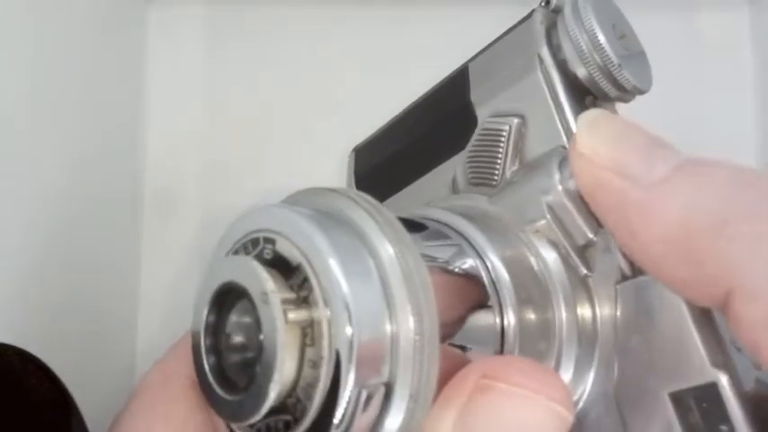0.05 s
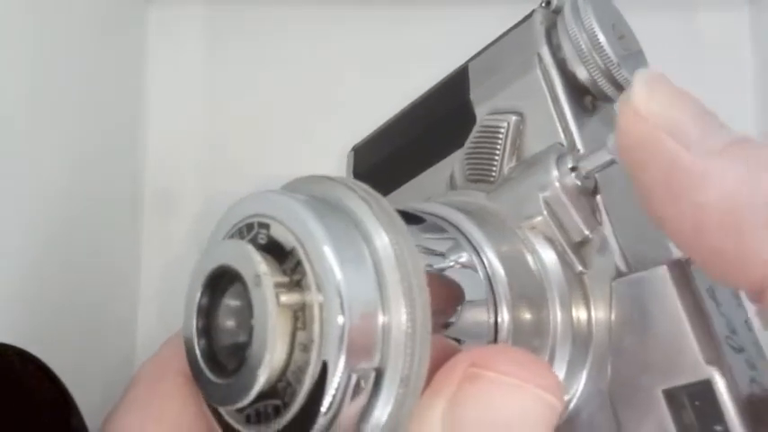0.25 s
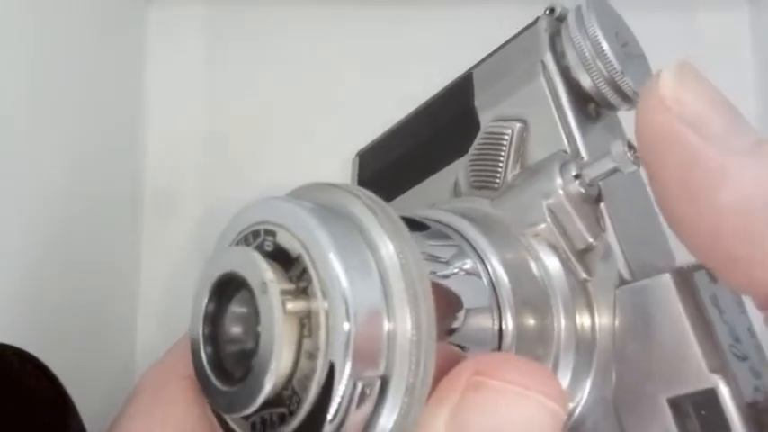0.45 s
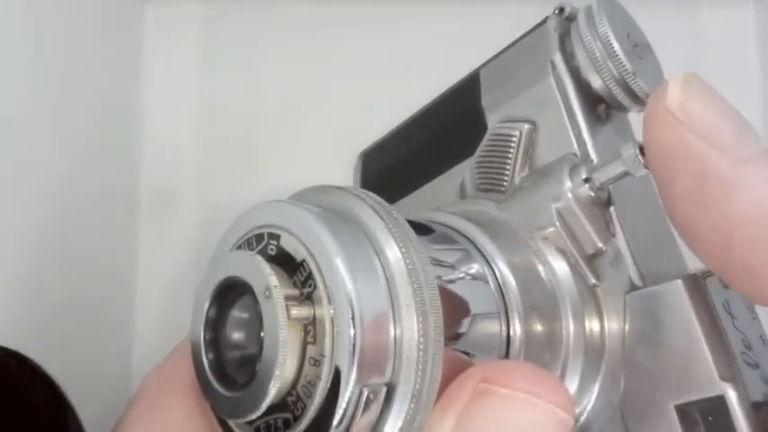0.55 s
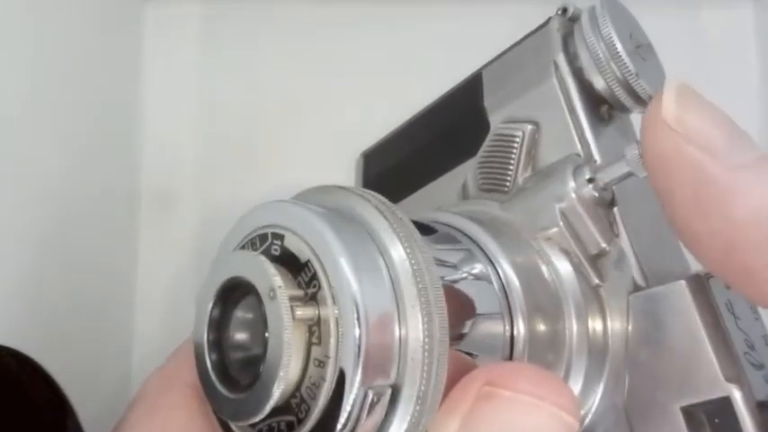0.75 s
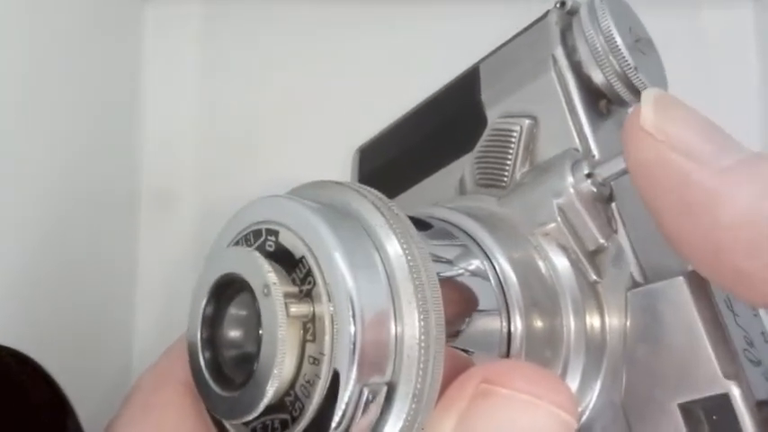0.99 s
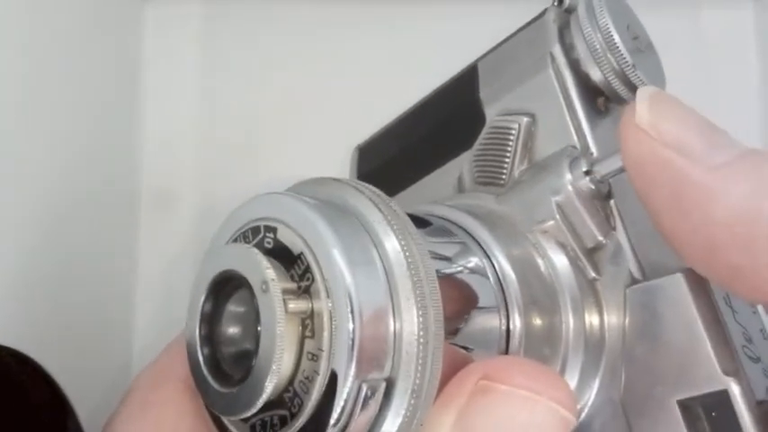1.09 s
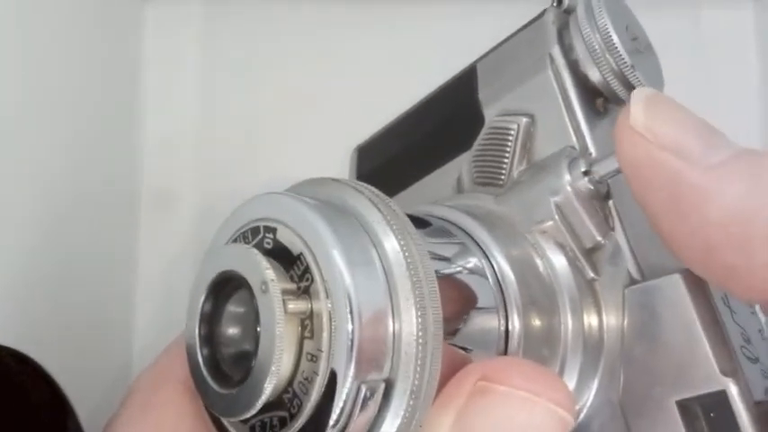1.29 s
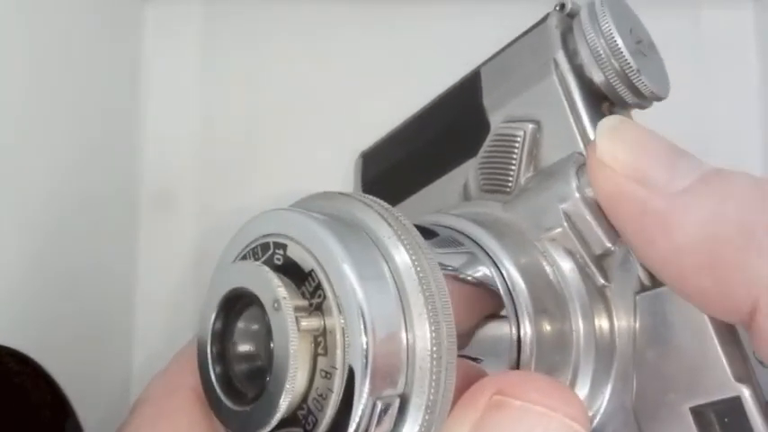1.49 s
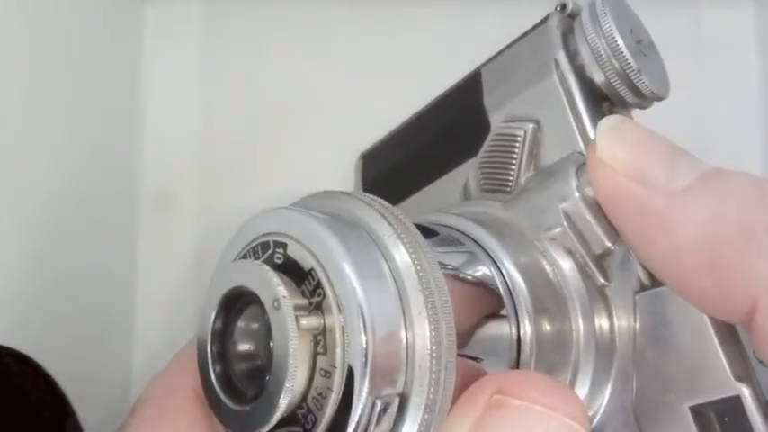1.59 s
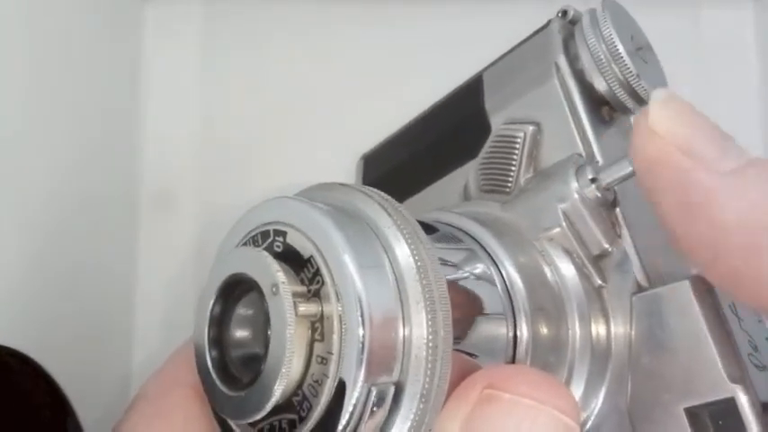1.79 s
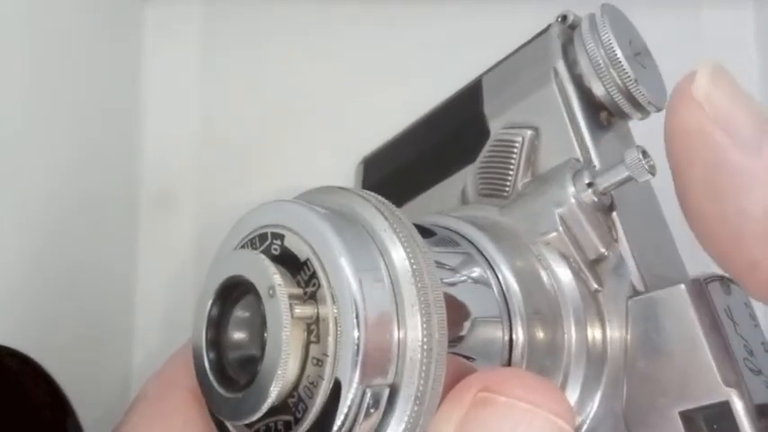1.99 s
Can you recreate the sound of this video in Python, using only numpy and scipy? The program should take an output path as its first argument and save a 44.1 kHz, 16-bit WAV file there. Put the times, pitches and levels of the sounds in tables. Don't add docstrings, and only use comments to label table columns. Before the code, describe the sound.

A hand-worked mechanical camera shutter snaps, its button clicks back, and it snaps once more

```python
import sys
import numpy as np
from scipy import signal
from scipy.fft import rfft, irfft, next_fast_len
from scipy.io import wavfile
from scipy.ndimage import uniform_filter1d, map_coordinates

SR = 44100
rng = np.random.default_rng(int(sys.argv[2]) if len(sys.argv) > 2 else 0)


def to_linear_factor(level_db):
    exponent = np.asarray(level_db, float) / 20
    return 10 ** exponent


def wav_record(signal):
    frames = np.transpose(np.atleast_2d(signal))
    bounded = np.clip(frames, -1, 1)
    quanta = np.round(bounded * 32767).astype(np.int16)
    wavfile.write(sys.argv[1], SR, quanta)


N = 90404
TIME_S = np.arange(N) / SR
BROAD_DB = -19
SINK_DB, SINK_S = 13, 0.25


def unit(x):
    return x / np.sqrt(np.mean(x ** 2) + 1e-20)


def along(points, hz):
    f, v = np.transpose(points)
    return np.interp(np.log(hz + 1), np.log(f + 1), v)


def wobble(rate_hz):
    return map_coordinates(rng.standard_normal(2000), [TIME_S * rate_hz])


def filtered(x, response):
    m = next_fast_len(len(x) + 8192)
    return irfft(rfft(x, m) * response(np.fft.rfftfreq(m, 1 / SR)), m)[:len(x)]


def capped(x):
    top_hz, edge_hz = 15760, 100

    def edge(hz):
        return np.sin(np.pi / 2 * np.clip((top_hz - hz) / edge_hz + 0.5, 0, 1)) ** 2
    return filtered(x, edge)


def evened(x):
    z = rfft(x)
    local_power = uniform_filter1d(np.abs(z) ** 2, size=60)
    return irfft(z / np.sqrt(local_power), len(x)) * (np.arange(len(x)) < len(x) // 2)


def body(x, peaks, smear=1, broad_db=BROAD_DB):
    def response(f):
        total = to_linear_factor(broad_db) * (1j * f / (1000 + 1j * f)) ** 2
        for k, (hz, width_hz, db) in enumerate(peaks):
            drive = (-1) ** k * to_linear_factor(db) * 1j * f * width_hz * np.sqrt(smear)
            total = total + drive / (hz * hz - f * f + 1j * f * width_hz * smear)
        return total
    return filtered(x, response)


def duck_db(db, t):
    recover_s, slope, from_db = 0.085, -1.1, -25
    return slope * max(db - from_db, 0) * np.exp(-(t / recover_s) ** 2) * (t >= 0)


# (frequency [Hz], t60 [s])
ROOM_DECAY = [(500, 0.37), (2000, 0.33), (6000, 0.4), (8000, 0.32), (10500, 0.3), (13000, .25),
              (15000, .27)]
# (frequency [Hz], level [dB])
ROOM_TILT = [(300, -2), (1000, 1.5), (3000, -4), (6000, 2), (7900, -2), (10500, 0), (13000, -1.5),
             (15300, 3)]


def room_tail(db, peaks, broad_db):
    streak_db, streak_life = 3.5, 0.07
    hz, t, z = signal.stft(rng.standard_normal(SR // 2), SR, nperseg=512)
    strong, long = rng.standard_normal((2, len(hz), 1))
    t60_s = along(ROOM_DECAY, hz)[:, None] * np.exp(streak_life * long)
    fall_db = -60 * t / t60_s + along(ROOM_TILT, hz)[:, None] + streak_db * strong
    fall_db = fall_db + duck_db(db, t) - SINK_DB * (t / SINK_S) ** 1.5
    noise = signal.istft(z * to_linear_factor(fall_db), SR, nperseg=512)[1]
    tail = capped(body(noise, peaks, 3, broad_db))
    return tail / np.linalg.norm(tail)


def contacts(rows, peaks, room=None, broad_db=BROAD_DB):
    lead_s, rise_s, strike_db, rough_db, room_broad_db = 0.3, 0.0008, 11, 2, 3
    out, t = np.zeros(N + 2 * SR), np.arange(SR // 10) / SR
    for s, db, t60_s, room_db in rows:
        grain, bumps = rng.standard_normal((2, len(t)))
        rough = rough_db * unit(uniform_filter1d(bumps, size=30))
        chatter = grain * to_linear_factor(rough - 60 * t / t60_s) * (1 - np.exp(-(t / rise_s) ** 2))
        chatter[round(rise_s * SR)] += to_linear_factor(strike_db)
        click = body(evened(chatter), peaks, broad_db=broad_db)
        click = to_linear_factor(db) * click / np.abs(click).max()
        tail = room_tail(db, room or peaks, broad_db + room_broad_db)
        wet = to_linear_factor(room_db) * np.linalg.norm(click) * tail
        at = round((s + lead_s) * SR)
        out[at:][:len(t)] += click
        out[at + 130:][:len(wet)] += wet * np.minimum(np.arange(len(wet)) / 200, 1)
    return out[round(lead_s * SR):][:N]


# (frequency [Hz], density [dB per Hz])
AIR_LOW = [(15, -46), (25, -10.5), (151, -0.5), (306, -6.5), (407, -9.5), (549, -12.5), (583, -11),
           (677, -23.5), (900, -25.5), (1170, -59.5), (1980, -120)]
AIR_HIGH = [(410, -24), (700, -5.5), (1400, -7.5), (3870, -12), (6500, -14), (8180, -26), (13500, -27),
            (14800, -14.5), (16000, -31.5)]
# (frequency [Hz], rms level [dB])
FAN_TONES = [(157, -80.5), (301, -82.5), (489.9, -78.5), (587.5, -77), (638, -86), (1421, -89.5),
             (4457.6, -83.5)]


def background():
    low_db, high_db, sway_db, sway_hz = -70, -78, 3.5, 1500
    low = filtered(rng.standard_normal(N), lambda hz: to_linear_factor(along(AIR_LOW, hz)))
    low = unit(low * to_linear_factor(1.8 * wobble(4.7)))
    high = filtered(rng.standard_normal(N), lambda hz: to_linear_factor(along(AIR_HIGH, hz)))
    high = unit(high * to_linear_factor(0.86 * wobble(17)))
    out = to_linear_factor(low_db) * low + to_linear_factor(high_db) * high
    for hz, db in FAN_TONES:
        sway = sway_db * min(1, sway_hz / hz) ** 0.5 * wobble(13)
        phase = 2 * np.pi * hz * TIME_S + 0.15 * wobble(2.5)
        out += np.sqrt(2) * to_linear_factor(db + sway) * np.sin(phase)
    return out


# (time [s], peak [dB], chatter t60 [s], room [dB])
EARLIER = [
    (-0.21, -6, 0.027, -10),
]
# (frequency [Hz], width [Hz], level [dB])
RETURN_BODY = [(542, 44, -18), (1180, 88, -21), (1660, 150, -27), (3940, 990, -15.5), (5915, 230, -2.5),
               (6540, 240, -1.5), (7000, 80, 2.5), (8420, 290, -2.5), (10550, 400, -9), (12095, 920, -8.5),
               (15280, 300, 6), (15400, 400, -1)]
RETURN_ROOM = [(574.3, 21, -7), (1170, 28, -8), (1836, 47, -11), (3626, 27, -17.5), (5650, 39, -4.5),
               (6260, 41, -17), (7060, 82.4, 2), (8800, 60, 3.5), (10200, 100, -10.5), (11600, 130, -16),
               (15000, 150, -4), (15550, 150, -6)]


def earlier_click():
    return contacts(EARLIER, RETURN_BODY, RETURN_ROOM)


# (frequency [Hz], level re blow [dB], t60 [s])
RINGS = [(535, -44.5, 0.33), (903, -43.5, 0.24), (1178, -52.5, 0.8), (1374, -51.5, 0.82), (2800, -58, 0.35),
         (3960, -57.5, 0.4), (5860, -50.5, .45), (7120, -50, 0.26), (8400, -56, 0.55)]


def rings(rows):
    out = np.zeros(N)
    for s, db, *_ in rows:
        t = np.maximum(TIME_S - s, 0)
        sink_db = SINK_DB * (t / SINK_S) ** 2
        for hz, level_db, t60_s in RINGS:
            start_db = db + level_db + rng.normal(0, 2.5)
            fall_db = 3 * wobble(30) - 60 * t / t60_s + duck_db(db, t) - sink_db
            detune = 1 + rng.normal(0, 0.0096)
            out += to_linear_factor(start_db + fall_db) * np.sin(2 * np.pi * hz * detune * t)
    return out


# (time [s], length [s], frequency [Hz], level [dB])
HANDS = [(0.092, 0.12, 94, -75), (0.6, 0.11, 71.6, -73.5), (0.805, 0.056, 84.17, -69),
         (0.94, 0.041, 610, -71.5), (1.069, 0.066, 2400, -81), (1.253, 0.06, 152, -62.5),
         (1.27, 0.039, 96, -60.5), (1.332, 0.054, 73, -74), (1.388, 0.1, 327, -71.5),
         (1.452, 0.21, 565, -70), (1.716, 0.051, 213, -67), (1.79, 0.059, 357, -68.5),
         (1.864, 0.21, 159, -70.5), (1.94, 0.14, 612, -64.5), (2.015, 0.043, 152, -67)]


def hands():
    out = np.zeros(N)
    for s, length_s, hz, db in HANDS:
        width = 0.15 * (min(1, 300 / hz) if hz < 999 else 1)
        band = filtered(rng.standard_normal(N), lambda f: np.exp(-(np.log((f + 1) / hz) / width) ** 2))
        out += to_linear_factor(db) * unit(band) * np.exp(-(2 * (TIME_S - s) / length_s) ** 2)
    return out


# (time [s], peak [dB], chatter t60 [s], room [dB])
TRIPS = [
    (0.1637, -34.5, .02, -6),
    (1.6865, -31, 0.023, -8.5),
]
# (frequency [Hz], width [Hz], level [dB])
TRIP_BODY = [(1640, 130, -1), (3600, 600, -18), (5840, 520, 0.5), (7300, 251.4, -8), (8500, 300, -12),
             (11900, 350, -10.5), (15400, 250, 0.5)]
LAST_TRIP_BODY = [(1630, 88, 0.5), (4070, 67, -5.5), (5900, 700, 1), (6650, 750, 0.5), (8490, 150, -11),
                  (12300, 390, -11), (14730, 370, -1), (14940, 440, -1.5)]


def trips():
    first = contacts(TRIPS[:1], TRIP_BODY, broad_db=-29)
    return first + contacts(TRIPS[1:], LAST_TRIP_BODY, broad_db=-24)


# (time [s], peak [dB], chatter t60 [s], room [dB])
OPENS = [
    (0.2235, -25.5, 0.034, -7.5),
    (1.7366, -22, 0.012, -10.5),
]
REBOUNDS = [
    (1.3872, -25.5, 0.015, -10),
    (1.7384, -24.5, 0.011, -30.5),
    (1.7592, -26.5, 0.034, -2.5),
]
# (frequency [Hz], width [Hz], level [dB])
OPEN_BODY = [(1195, 110, -5), (1656, 170, -5.5), (2530, 300, -4.5), (3500, 370, -1), (5860, 360, 1),
             (7000, 250, -5.5), (8500, 300, -13), (10900, 1200, -9), (11830, 500, -14), (14350, 300, -10),
             (15400, 300, -2.5)]
LAST_OPEN_BODY = [(1730, 144, -2.5), (2550, 100, -1), (3480, 330, -5), (4270, 250, -2.5), (5480, 670, 0.5),
                  (6690, 410, -2.5), (8280, 290, -10), (10980, 300, -3.5), (12030, 540, -23.5),
                  (15200, 380, -0.5), (16200, 250, -7)]


def opens():
    return contacts(OPENS[:1], OPEN_BODY) + contacts(OPENS[1:] + REBOUNDS[1:2], LAST_OPEN_BODY)


# (time [s], peak [dB], chatter t60 [s], room [dB])
TICKS = [(0.2377, -29.5, 0.0052, -11), (0.2396, -26, 0.008, -10), (0.2478, -30.5, 0.0043, -24),
         (0.2535, -37, 0.0061, -23.5), (1.3192, -53.5, 0.025, -17), (1.3295, -55, 0.06, -9),
         (1.3445, -49, .015, -25), (1.365, -42, 0.022, -41), (1.7515, -44.5, 0.0055, -37),
         (1.7785, -47, .008, -62), (2.047, -74, .02, -30.5)]
# (frequency [Hz], width [Hz], level [dB])
TICK_BODY = [(1670, 300, -22), (5900, 300, -1), (6850, 350, -5.5), (8450, 300, -13.5), (14820, 400, -14.5)]
SLIP_BODY = [(5780, 96, 2), (8500, 130, -21)]


def ticks():
    out = contacts(TICKS[:4], TICK_BODY, broad_db=-44.5)
    out += contacts(TICKS[4:6], SLIP_BODY, broad_db=-60)
    return out + contacts(TICKS[6:], TICK_BODY, broad_db=-45)


# (time [s], peak [dB], chatter t60 [s], room [dB])
SHUTS = [
    (0.242, -7, .009, -13.5),
    (1.7558, -15.5, 0.01, -4),
]
# (frequency [Hz], width [Hz], level [dB])
SHUT_BODY = [(923, 210, -16.5), (1630, 600, -18.5), (3950, 320, -26.5), (5880, 360, 5), (6580, 89, -5.5),
             (7100, 380, -19), (9000, 310, -16.5), (9650, 870, -14.5), (10430, 370, -13),
             (11040, 310, -8.5), (13540, 290, -12), (14430, 180, 2.5), (15500, 300, -8)]
SHUT_ROOM = [(925.5, 30, -17), (1370, 40, -15), (3200, 200, -23.5), (5498, 100, 10), (5700, 124, 9.5),
             (6660, 270, -1.5), (7090, 80, -18.5), (9220, 73, -17), (10368, 76, -22), (10900, 100, -9.5),
             (14700, 170, -6), (15400, 200, -8)]
LAST_SHUT_BODY = [(547, 19, -10.5), (880, 50, -18), (1714, 160, -10.5), (3580, 570, -13), (5290, 240, 0),
                  (6150, 440, 1.5), (6930, 670, -10.5), (8100, 390, -11.5), (10260, 460, -12.5),
                  (12700, 440, -12), (15400, 220, 3), (15350, 500, -3)]
LAST_SHUT_ROOM = [(510, 47, -7), (1280, 21, -37), (1850, 91, -13), (4430, 180, -35), (5320, 120, -0.5),
                  (5990, 44, 0), (6090, 140, 3.5), (6550, 40, 0), (8900, 100, -29), (10700, 120, -42),
                  (11800, 100, -18), (14500, 120, 0), (15400, 130, -9)]


def shuts():
    first = contacts(SHUTS[:1], SHUT_BODY, SHUT_ROOM)
    return first + contacts(SHUTS[1:] + REBOUNDS[2:], LAST_SHUT_BODY, LAST_SHUT_ROOM)


# (time [s], level [dB])
SCRAPE = [(1.322, -85), (1.328, -66), (1.337, -60), (1.3455, -53), (1.35, -64), (1.356, -62), (1.36, -84)]
# (frequency [Hz], width [Hz], level [dB])
SCRAPE_BODY = [(1700, 52, 10), (4100, 180, -6), (6065, 230, -6), (6510, 270, -4), (9000, 400, -4),
               (12800, 330, -20), (15100, 400, -11)]


def scrape():
    s, db = np.transpose(SCRAPE)
    rough = rng.standard_normal(N) * to_linear_factor(2.9 * wobble(300))
    rub = unit(body(rough, SCRAPE_BODY, broad_db=-32))
    return capped(rub * to_linear_factor(np.interp(TIME_S, s, db, -140, -140)))


# (time [s], peak [dB], chatter t60 [s], room [dB])
RETURNS = [
    (1.3566, -20, 0.031, -9),
    (1.3839, -15.5, 0.021, -9.5),
]
# (frequency [Hz], width [Hz], level [dB])
FIRST_RETURN_BODY = [(1780, 170, -9.5), (2400, 160, -38), (3510, 390, -11.5), (6020, 265, 3.5),
                     (6634, 290, 3), (8200, 810, -8), (11450, 320, -5.5), (12520, 650, -9.5),
                     (14550, 240, 0.5), (15480, 320, -4)]


def returns():
    first = contacts(RETURNS[:1], FIRST_RETURN_BODY)
    return first + contacts(RETURNS[1:] + REBOUNDS[:1], RETURN_BODY, RETURN_ROOM)


# (frequency [Hz], level [dB])
MIC = [(450, 2.5), (850, 2), (4200, 2), (4950, -6.5), (5350, -0.5), (6800, 3.5), (7300, 3.5), (14300, 4)]


def microphone(x):
    return filtered(x, lambda hz: to_linear_factor(along(MIC, hz)))


def scene():
    shutter = earlier_click() + trips() + opens() + ticks() + shuts() + returns()
    loud = SHUTS + RETURNS[1:]
    near = microphone(shutter + rings(loud + EARLIER) + scrape())
    gain_db = 0.6 * sum(duck_db(db, TIME_S - s) for s, db, *_ in loud)
    return (near + hands() + to_linear_factor(gain_db) * capped(background()))[None]


def band_limit(x):
    return signal.sosfilt(signal.butter(12, 16970, fs=SR, output="sos"), x)


def record(dry):
    top_hz = 16600
    mix = filtered(dry[0], lambda hz: 1 / (1 + (hz / top_hz) ** 60))[None]
    return band_limit(mix)


dry = scene()
out = record(dry)
wav_record(out)
```